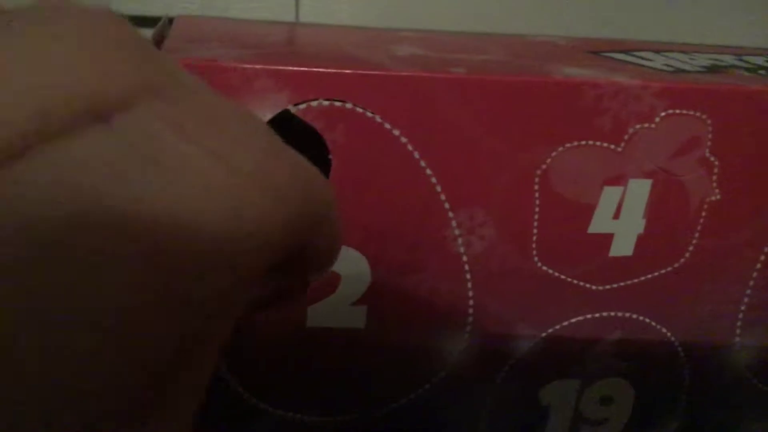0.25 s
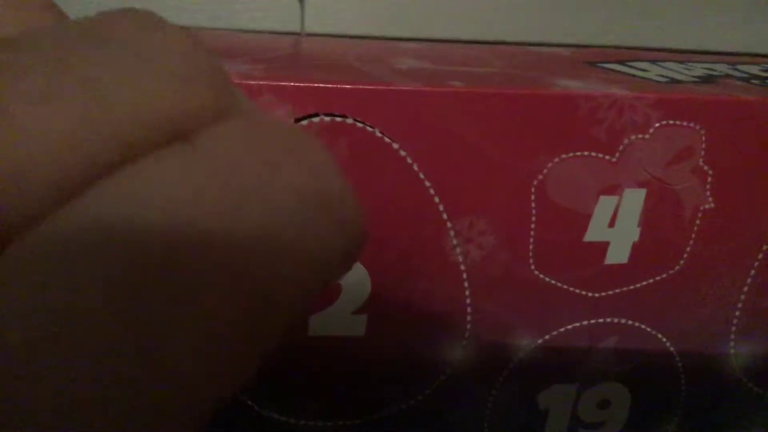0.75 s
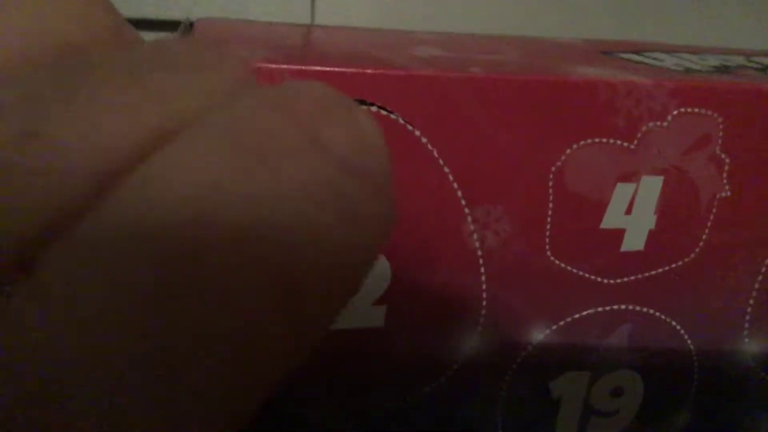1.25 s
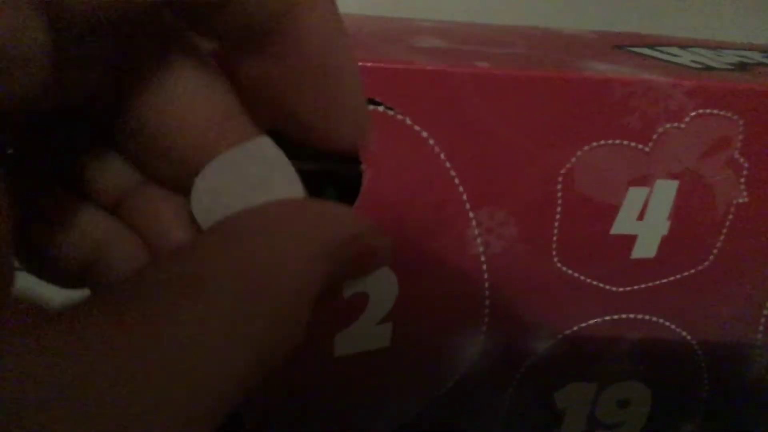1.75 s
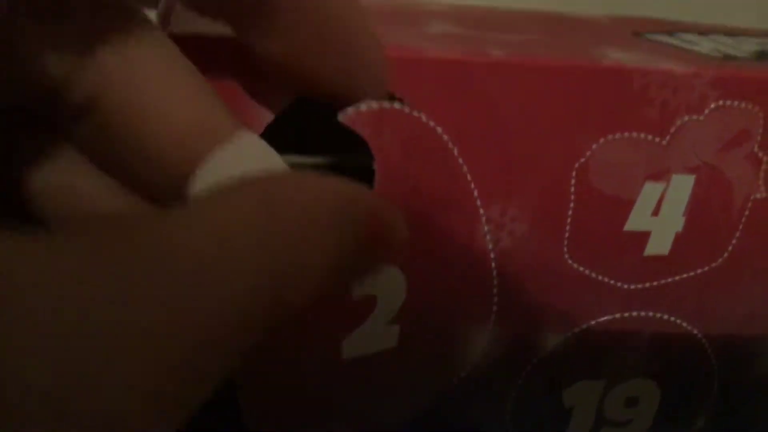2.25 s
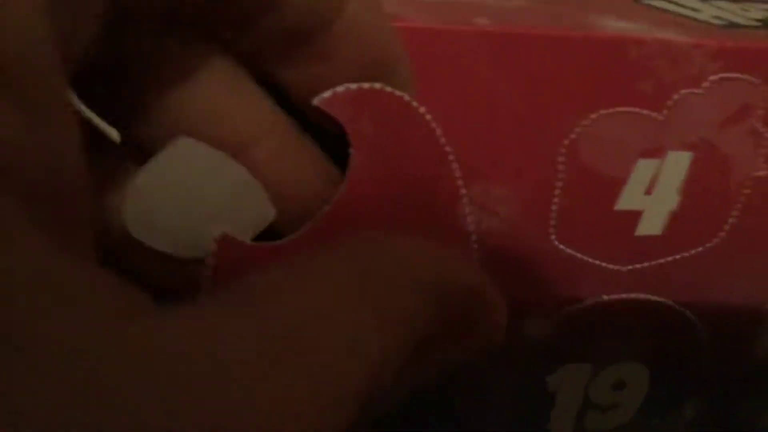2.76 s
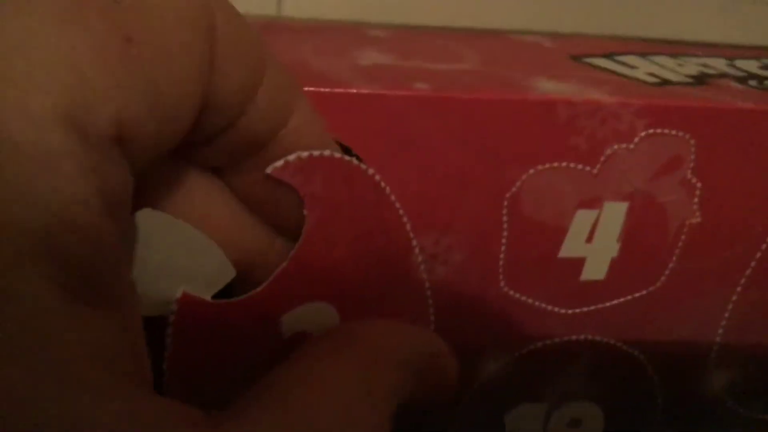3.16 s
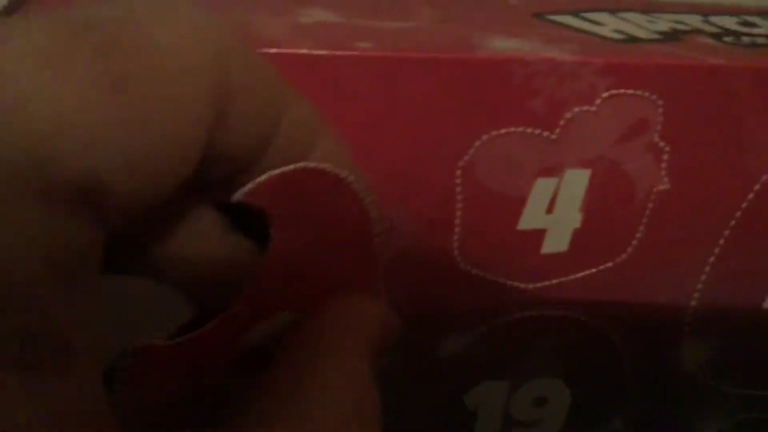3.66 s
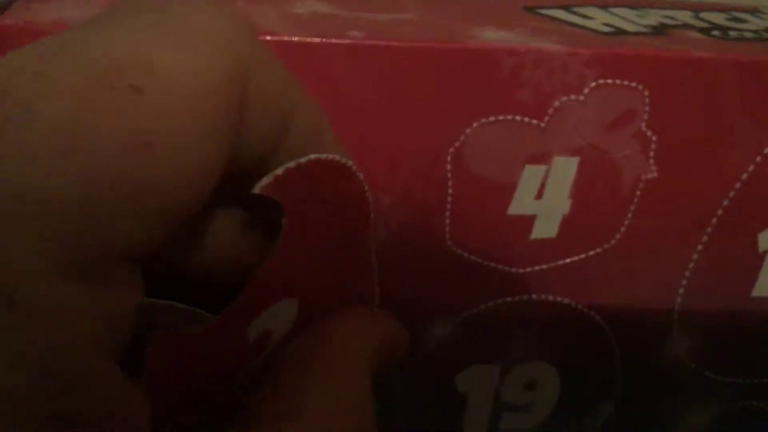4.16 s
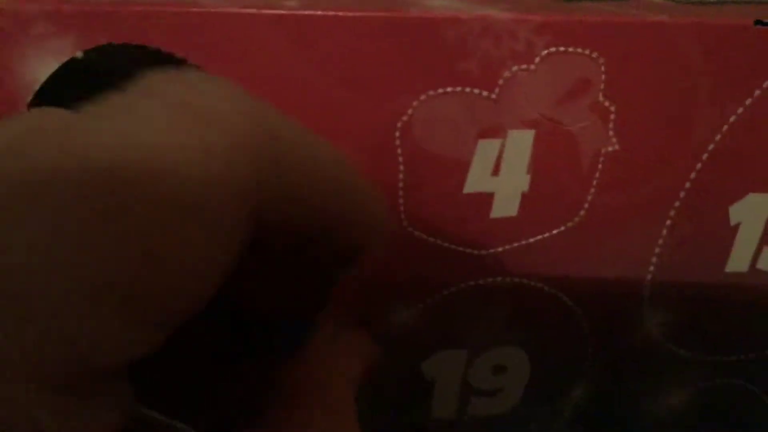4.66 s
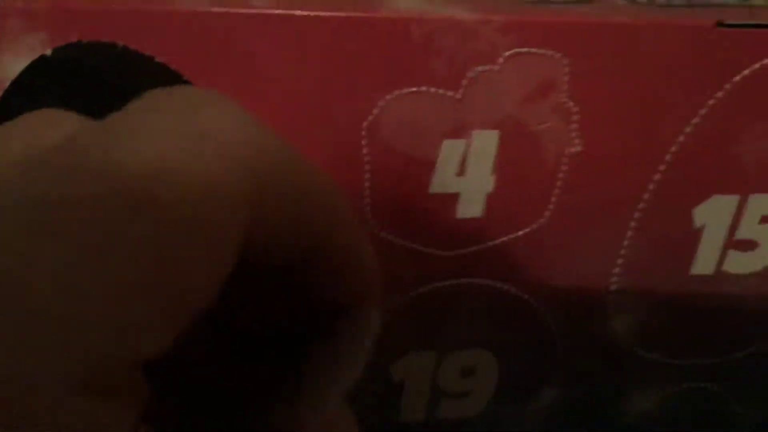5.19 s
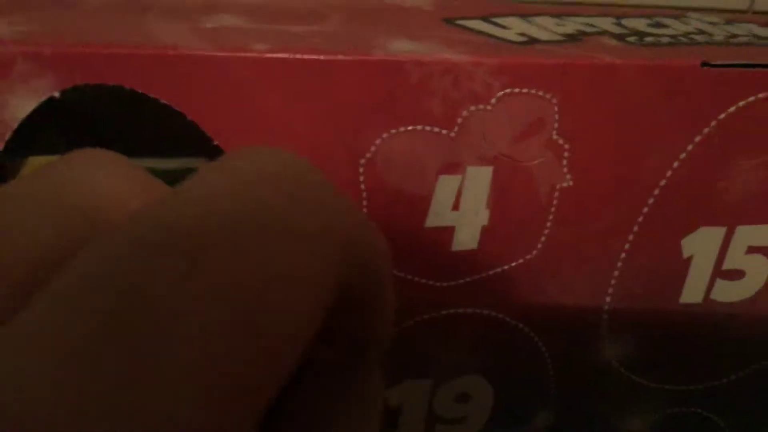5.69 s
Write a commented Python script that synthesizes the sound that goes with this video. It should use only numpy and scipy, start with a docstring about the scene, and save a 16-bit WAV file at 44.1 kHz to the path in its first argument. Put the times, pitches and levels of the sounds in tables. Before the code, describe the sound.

Very close to the microphone in a small quiet room, fingers work at a cardboard door. Dry snaps come irregularly in the first two seconds, with soft rubbing between. After a quieter stretch, two loud cracks land together, then a cluster of hollow pops, a crackly rasping peel and one last strong snap before faint ticks.

```python
"""Fingers pick at the perforated door of a cardboard box, close to the microphone in a small, quiet room.
The paper bridges of the perforation break one by one: each snap is an impulse that excites the box's modes.
In between, skin slides over the card by stick and slip, and torn edges scrape, rasp and tick.
Short room reflections follow the sounds, over a low background rumble with a faint hiss."""
import sys
import numpy as np
from scipy import signal
from scipy.fft import rfft, irfft, next_fast_len
from scipy.io import wavfile
from scipy.ndimage import uniform_filter1d

SR = 44100
rng = np.random.default_rng(int(sys.argv[2]) if len(sys.argv) > 2 else 0)


def bounce(signal):
    """Save signal as a 16-bit WAV file at the path given by the first command-line argument."""
    frames = np.transpose(np.atleast_2d(signal))
    limited = np.clip(frames, -1, 1)
    pcm = np.round(limited * 32767).astype(np.int16)
    wavfile.write(sys.argv[1], SR, pcm)


N = 261500
SIZE = 4096  # samples in a blow or a filter

# strokes of a finger over the card, levels before mixing: (start [s], length [s], pressure [dB],
#  swell from start to end [dB], panel drumming against skin [dB], fibres scraping against skin [dB])
STROKES = [(0.005, 0.038, -64, 5, -1.5, -9.5), (0.211, 0.072, -81, -7, 8, 6.5),
           (0.283, 0.11, -75, 15.5, 6.5, -5), (0.99, 0.1, -60.5, -2, 1.5, -8.5),
           (1.102, 0.15, -77, -5, 9, -12.5), (1.324, 0.14, -67.5, 9, -3, -12),
           (1.474, 0.087, -69, 5, -6, -12.5), (1.539, 0.1, -65.5, -2, -0.5, -9),
           (1.669, 0.21, -79, 3, 7.5, -4.5), (1.883, 0.02, -61, 13.5, -8, -11),
           (2.211, 0.019, -76.5, 4, 9, -7), (2.35, 0.053, -70.5, -2, 4.5, -13),
           (2.445, 0.08, -72.5, -13, -9, -11), (2.521, 0.23, -73, 2, 0.5, -13),
           (2.778, 0.27, -72, -16.5, 1.5, -14.5), (3.012, 0.109, -69.5, 6, 3, -14.5),
           (3.237, 0.1, -76.5, -14, 9.5, -14), (3.381, 0.2, -67.5, 16, -3.5, -6),
           (3.691, 0.15, -82.5, 21, 7, -5.5), (3.798, 0.064, -79.5, -5, 3, 3.5),
           (3.834, 0.114, -76, 9, 2.5, -0.5), (3.951, 0.1, -83, 3, 11, 3), (4.194, 0.13, -74, 19, 8, -5.5),
           (4.337, 0.17, -69, 4, -5.5, 1), (4.601, 0.071, -78, -1, -5, 5), (4.777, 0.084, -73.5, 1, -4, 6),
           (4.867, 0.16, -84.5, 4, 5.5, 3.5), (5.083, 0.096, -68, 25.5, 2.5, 2.5),
           (5.203, 0.18, -81, -11, -1.5, -29), (5.408, .16, -84.5, 3.5, 7, -4),
           (5.628, 0.064, -74.5, -8, -7, 2.5)]
# how far the door has come loose: (time [s], share [0-1])
LOOSE = [(1.9, 0.07), (3.5, 0.94)]
# colour of breaking card: (frequency [Hz], level [dB])
CARD = [(85, -11), (140, 1), (300, 2.5), (1900, -3.5), (3150, -3), (3650, -7.5), (4300, -3.5), (6300, -7.5),
        (7600, -14), (8400, -4.5), (10000, -4), (16000, -14)]
# colour of scraping fibres: (frequency [Hz], level per Hz [dB])
FIBRE = [(1500, -35), (4000, -5.5), (6200, -5.5), (7700, -10), (8600, 0.5), (10000, -3.5), (11800, 0.5),
         (14000, -5.5), (16000, -9.5)]


def amp(db):
    """Amplitude gain from a level in decibels."""
    return 10 ** (np.asarray(db) / 20)


def unit(x):
    """Normalises the mean power, so that the rms is 1."""
    return x / np.sqrt(np.mean(x ** 2) + 1e-20)


def read(points, hz):
    """Interpolates a table linearly on a logarithmic frequency axis."""
    f, value = np.transpose(points)
    return np.interp(np.log(hz + 1), np.log(f + 1), value)


def add(mix, s, sound):
    """Superposition: adds a sound to the mix, in place, from time s [s]."""
    part = mix[round(s * SR):][:len(sound)]
    part += sound[:len(part)]


def colour(x, points):
    """Minimum-phase filter with the given spectrum: causal, so nothing sounds ahead of a click."""
    log_gain = np.log(amp(read(points, abs(np.fft.fftfreq(SIZE, 1 / SR)))))
    taps = np.fft.ifft(np.exp(np.conj(signal.hilbert(log_gain)))).real
    return signal.fftconvolve(x, taps)[:len(x)]


def dying(t60, size):
    """Diffuse decay: noise of energy 1 in which each frequency has its own reverberation time."""
    hz, t, z = signal.stft(rng.standard_normal(size), SR, nperseg=128)
    decay = read(t60, hz)[:, None]
    z = z * amp(-60 * t / decay) / np.sqrt(decay)
    tail = signal.istft(z, SR, nperseg=128)[1][:size]
    return tail / np.linalg.norm(tail)


def wander(hz):
    """Slow random modulation: Gaussian noise limited to below hz, of rms 1."""
    size = next_fast_len(N)
    spectrum = rfft(rng.standard_normal(size))
    slow = np.fft.rfftfreq(size, 1 / SR) < hz
    return unit(irfft(spectrum * slow, size)[:N])


def resonate(x, hz, width_hz):
    """Single resonance of peak gain 1: a low-pass in a frame turning at the pitch, which may move."""
    turn = np.exp(2j * np.pi * np.cumsum(hz * np.ones(len(x))) / SR)
    r = np.exp(-np.pi * width_hz / SR)
    return 2 * (turn * signal.lfilter([1 - r], [1, -r], x / turn + 1e-18)).real


def background(waver_db=2.06):
    """Stationary noise: a low room rumble under a faint hiss, its low part wavering in level."""
    # spectrum of the background: (frequency [Hz], level per Hz [dB])
    floor = [(20, -34), (40, -9), (60, -3), (95, 1.5), (150, -0.5), (200, -1), (320, -2), (430, -13),
             (650, -16.5), (1100, -25), (2800, -27), (9000, -35.5), (15500, -40.5)]
    noise = unit(colour(rng.standard_normal(N + SIZE), floor)[SIZE:])
    low = signal.sosfilt(signal.butter(1, 500, fs=SR, output="sos"), noise)
    wavering = noise + low * (amp(waver_db * wander(8.7)) - 1)
    return amp(-67) * wavering


def room(x, build_s=0.0025):
    """Reverberation: reflections from the table and near walls build up quickly and die soon."""
    # reverberation time: (frequency [Hz], t60 [s])
    room_t60 = [(110, 0.27), (230, 0.08), (2500, 0.22), (8000, 0.26), (15000, 0.1)]
    # colour of the reflections: (frequency [Hz], level [dB])
    room_colour = [(120, -10), (240, -5), (420, -7), (680, -6.5), (1100, -17), (3000, -15), (9000, -19),
                   (14000, -15.5)]
    size = 3 * SIZE
    t = np.arange(size) / SR
    tail = dying(room_t60, size) * (1 - np.exp(-(t / build_s) ** 2))
    return signal.fftconvolve(x, colour(tail / np.linalg.norm(tail), room_colour))[:N]


def box(s, ring_db, scatter_db):
    """Modal impulse response: a direct pulse, and modes whose strength and pitch depend on the spot."""
    # resonances of box and door: (frequency [Hz], level, door shut [dB], level, door loose [dB], t60 [s])
    modes = [(128, -12.5, -21.5, 0.26), (199, -15.5, -7.5, 0.13), (320, -8.5, -9, 0.012),
             (370, -1, 3, 0.03), (510, -9.5, -7.5, 0.025), (749, -4, 2.5, 0.045), (1005, 0, -17.5, 0.021),
             (1203, -5, 3, 0.023), (1540, -0.5, -8, 0.022), (1880, -1, -0.5, 0.02),
             (2888, -0.5, -3.5, 0.018), (3300, -6.5, -5, 0.015), (4040, -4.5, 2, 0.0042),
             (9700, -10, -2.5, 0.013)]
    hz, shut_db, loose_db, t60 = np.transpose(modes)[:, :, None]
    loose = np.interp(s, *np.transpose(LOOSE))
    t = np.arange(SIZE) / SR
    mode_db = shut_db + loose * (loose_db - shut_db) + scatter_db * rng.standard_normal(hz.shape)
    hz = hz * (1 + 0.015 * rng.standard_normal(hz.shape))
    ring = (amp(mode_db - 60 * t / t60) * np.cos(2 * np.pi * hz * t)).sum(0)
    return (t == 0) + amp(ring_db) * ring / np.linalg.norm(ring)


def hollow(x, ring_db, width_hz):
    """Cavity resonance: the gap between hand and card rings, its pitch and strength shifting with the fingers."""
    # resonance of the gap: (time [s], mean pitch [Hz], strength relative to ring_db [dB])
    gap = [(1.0, 2400, -8.5), (1.43, 2810, 0), (1.55, 2500, -17), (2.38, 2370, 6), (2.75, 2490, 11),
           (3.0, 2490, -5), (3.55, 2605, 4), (4.9, 2541, 3.5), (5.3, 2540, -9.5)]
    times, pitches, strengths = np.transpose(gap)
    t = np.arange(N) / SR
    hz = np.interp(t, times, pitches)
    cupped_db = np.interp(t, times, strengths)
    wavering_hz = hz * (1 + 0.012 * wander(15))
    return x + amp(ring_db + cupped_db) * resonate(x, wavering_hz, width_hz)


def peeling():
    """Smoothed gate: 1 while the loose flap is being peeled back, else 0."""
    # span of the peeling: (from [s], to [s])
    peel_s = (4.7, 5.25)
    t = np.arange(N) / SR
    inside = (t > peel_s[0]) & (t < peel_s[1])
    return uniform_filter1d(1. * inside, size=1024)


def flap(x):
    """Plate resonances: held out from the box, the flap rings with every catch."""
    # resonances of the flap: (frequency [Hz], level [dB])
    flap_modes = [(760, -7), (1220, -20), (2600, -2.5), (4150, 0), (4900, 4), (10200, -2.5)]
    held = x * peeling()
    return x + sum(amp(db) * resonate(held, hz, width_hz=190) for hz, db in flap_modes)


def pressure(offsets_db, resting_db):
    """Contact envelope by summed power: each stroke takes hold, swells or eases, and lets go."""
    attack_s, release_s = 0.018, 0.0077
    power = np.full(N, amp(resting_db) ** 2)
    t = np.arange(SR // 2) / SR
    for (start, length, level_db, swell_db, *_), offset_db in zip(STROKES, offsets_db):
        shape = np.minimum(t / attack_s, 1) * np.exp(-np.maximum(t - length, 0) / release_s)
        stroke_db = level_db + offset_db + swell_db * (np.minimum(t / length, 1) - .5)
        add(power, start, (shape * amp(stroke_db)) ** 2)
    return np.sqrt(power)


def slide(contact, spectrum, slips_per_s, spread_db, hiss_db, ring_db, flutter_db):
    """Stick and slip: a hail of tiny slips of uneven size over a fine hiss, heard through the box."""
    sizes = amp(spread_db * np.minimum(rng.exponential(1, N), 4.5)) * rng.choice([-1, 1], N)
    slips = unit(sizes * (rng.random(N) < slips_per_s / SR))
    friction = slips + amp(hiss_db) * rng.standard_normal(N)
    # the box keeps its final, loose state throughout
    body = box(N / SR, ring_db, scatter_db=4.5)
    sound = colour(signal.fftconvolve(friction, body)[:N], spectrum)
    return unit(sound) * contact * amp(flutter_db * wander(30))


def rip(contact, per_s, jitter, spread_db, body_db, count=1500):
    """Near-periodic pulse train: fibres along the tear give way one after another, a rasp."""
    gaps, sizes = rng.standard_normal((count, 2)).T
    times = np.cumsum(np.exp(jitter * gaps)) / per_s
    gains = amp(spread_db * np.clip(sizes, -2, 2))
    n = np.arange(SIZE // 32)
    pulses = np.zeros(N)
    for s, gain in zip(times, gains):
        add(pulses, s, gain * rng.standard_normal(len(n)) * np.exp(-n / 30))
    return contact * unit(colour(pulses, FIBRE) + amp(body_db) * colour(pulses, CARD))


def rubbing():
    """Friction noise: the panel drums, skin hisses on the print, torn fibres scrape, crackle and rasp."""
    # colours of the drumming panel, sliding skin and crackling loose fibres: (frequency [Hz], level per Hz [dB])
    drum_colour = [(50, -22), (150, 7.5), (380, -3), (590, -3), (730, 2.5), (860, -2), (1150, -1.5),
                   (1700, -7), (6000, -58)]
    skin_colour = [(600, -37.5), (1800, -10.5), (2420, -1), (3050, -3), (4300, -2.5), (5300, -9.5),
                   (7500, -20), (15000, -35)]
    crackle_colour = [(150, -11.5), (700, 4), (1400, -2.5), (3000, -4.5), (6500, -16.5), (10000, -15),
                      (16000, -20.5)]
    # the hand never lies quite still, levels before mixing: (drumming [dB], skin [dB], fibres [dB])
    resting_db = (-86, -95.5, -91.5)
    *_, drum_db, fibre_db = np.transpose(STROKES)
    on_panel = pressure(drum_db, resting_db[0])
    on_print = pressure(np.zeros(len(STROKES)), resting_db[1])
    on_edge = pressure(fibre_db, resting_db[2])
    drum = slide(on_panel, drum_colour, slips_per_s=180, spread_db=3.5, hiss_db=0,
                 ring_db=-14.0, flutter_db=2.0)
    skin = slide(on_print, skin_colour, slips_per_s=600, spread_db=2.2, hiss_db=-4,
                 ring_db=-16, flutter_db=1.8)
    # the scraping is softer while the rasp is heard
    fibre = slide(on_edge * amp(-6 * peeling()), FIBRE, slips_per_s=1200, spread_db=2.5, hiss_db=-1,
                  ring_db=-7.0, flutter_db=2.0)
    crackle = slide(np.sqrt(on_panel * on_edge), crackle_colour, slips_per_s=140, spread_db=3.0, hiss_db=-25,
                    ring_db=1.5, flutter_db=1.5)
    rasp = rip(on_edge * peeling(), per_s=210, jitter=0.15, spread_db=2.0, body_db=4.5)
    smooth = amp(-1.35) * drum + amp(-4.0) * skin
    rough = amp(3.2) * fibre + amp(-2.5) * crackle + amp(0.5) * rasp
    return smooth + rough


def fracture(body, length, fibres_db, flex_db, count=14):
    """Impulsive excitation: a main break and a few later fibres ring the body; the panel flexes densely."""
    # dense flexing of the panel after a blow: (frequency [Hz], t60 [s])
    flexing = [(150, 0.069), (600, 0.11), (2500, 0.025), (6000, 0.026), (14000, 0.021)]
    pulses = np.zeros(SIZE)
    delay = np.minimum(rng.exponential(1, count), 3)  # in units of the fracture's length
    places = (delay * length * SR).astype(int) + 2
    pulses[places] = amp(fibres_db) * rng.standard_normal(count) * np.exp(-delay / 2)
    pulses[0] = 1
    ringing = signal.fftconvolve(pulses / np.linalg.norm(pulses), body)[:SIZE]
    return ringing + amp(flex_db) * dying(flexing, SIZE)


def weighted(hit, edges, levels_db):
    """Band energy: filters a blow towards the given level in each register, in two passes."""
    level_span_s = 0.025  # levels count the blow's energy as mean power over this time
    hz, edges = np.fft.rfftfreq(SIZE, 1 / SR), np.array(edges)
    centres = np.sqrt(edges[1:] * edges[:-1])
    for _ in range(2):
        power = abs(rfft(hit)) ** 2 * 2 / (SIZE * level_span_s * SR)
        bands = [power[(hz >= lo) & (hz < hi)].sum() for lo, hi in zip(edges, edges[1:])]
        hit = colour(hit, np.c_[centres, levels_db - 10 * np.log10(bands)])
    return hit


def ticks():
    """Light impulses: tiny catches of nail and torn edge."""
    # catches, levels before mixing: (time [s], strength [dB], treble against body [dB])
    catches = [(0.203, -67, -10), (0.3586, -62.5, -1.5), (0.4753, -71.5, 0.5), (1.5551, -60.5, 1),
               (1.758, -65.5, 4.5), (2.342, -72.5, -0.5), (2.607, -70, -18), (2.767, -67.5, -7.5),
               (3.981, -67, -4), (4.0191, -64.5, -24), (4.0908, -68, -21.5), (4.1046, -77.5, 10),
               (4.664, -70.5, 9), (4.7937, -75.5, 9.5), (4.821, -59.5, 3), (4.8466, -61, 4.5),
               (4.894, -75, 8.5), (4.9219, -69, -3.5), (4.97, -75, 1), (4.985, -70, 4.5),
               (4.9951, -66, 4.5), (5.017, -70, 7), (5.115, -75, 12), (5.129, -68, 10), (5.144, -57, 0),
               (5.4696, -71, -14), (5.49, -70, -22), (5.517, -66, -21), (5.5333, -66, -11),
               (5.546, -73, -16), (5.5601, -65, -10.5), (5.9205, -70, -5.5)]
    # edges of the body and treble registers: [Hz]
    tick_bands = [600, 4500, 16000]
    out = np.zeros(N)
    for s, strength_db, treble_db in catches:
        body = box(s, ring_db=2.5, scatter_db=2.5)
        hit = fracture(body, 0.0018, fibres_db=1.0, flex_db=5.5)
        hit = colour(colour(hit, CARD), [(150, -7.0), (900, -5)])
        levels_db = np.array([strength_db, strength_db + treble_db])
        add(out, s, weighted(hit, tick_bands, levels_db))
    return amp(-3.5) * out


def disperse(x, taut):
    """Dispersion of bending waves: card carries the treble first and the bass a little later."""
    for corner_hz in (300, 900, 2000, 5000):  # all-pass stages
        pole = np.exp(-2 * np.pi * corner_hz / SR)
        x = signal.lfilter([-pole, 1], [1, -pole], x)
    # a door held taut delays the bass further, below bloom_hz and by up to bloom_s
    bloom_s, bloom_hz = 0.00912, 217
    hz = np.fft.rfftfreq(2 * SIZE, 1 / SR)
    lag = np.exp(-2j * np.pi * taut * bloom_s * bloom_hz * np.arctan(hz / bloom_hz))
    return irfft(rfft(x, 2 * SIZE) * lag)[:SIZE]


def snaps():
    """Impulse and modal response: a break kicks the box, the struck spot rings, the room gets the broad thud."""
    # bridges breaking and the card buckling, levels before mixing: (time [s], length of the fracture [s],
    #  strength [dB], extra weight of the box's thump [dB], extra brightness [dB],
    #  ring of the struck spot [dB], room echo [dB], lower pitch of the spot [Hz], upper pitch [Hz])
    breaks = [(0.5351, 0.00045, -40.5, 0, 10, 8, -1, 160, 738),
              (0.7911, 0.0012, -53.5, -1.5, 1, 7, 0.5, 210, 1660),
              (0.9332, 0.00045, -49, 2.5, -1, 6, 3.5, 366, 1220),
              (0.9436, 0.00085, -60, 7.5, 11, 3, -3, 376, 1650),
              (0.9802, 0.00065, -41.5, 6.5, -15, 21.3, 0, 130, 410),
              (1.1107, 0.0013, -55.5, -7.5, 6, 21, -1, 407, 1224),
              (1.4422, 0.00033, -39, -8, -2, 20, 0.5, 308, 1270),
              (1.636, 0.00092, -40, 6.5, -7.5, 17.6, 0, 130, 385),
              (1.7954, 0.00064, -40, -5.5, -5, 22.5, -3, 292, 1005),
              (3.2341, 0.004, -72, 17.5, -7, 5.7, 7.5, 166, 370),
              (3.5342, 0.00029, -27.5, -10.5, -0.5, 5, -2, 790, 1880),
              (3.5888, 0.00053, -30.5, -4, 5.5, 2.7, -4, 770, 1313),
              (4.2979, 0.00091, -36, 2.5, 6.5, 27, -1, 180, 380),
              (4.3684, 0.000692, -32.5, -0.5, 0, 5, -3.5, 370, 775),
              (4.4415, 0.0012, -44.5, 3, 5.5, 8.2, -0.5, 255, 590),
              (5.1769, 0.0016, -31, 1, -2, 6, -2.5, 255, 720)]
    # edges of the registers: [Hz]
    snap_bands = [90, 250, 600, 1600, 4500, 8000, 16000]
    # an ordinary snap, a row a register: (level [dB], share of extra weight [1], share of extra brightness [1])
    snap_tone = [(-7, 1.28, 0.17), (-3.5, 0.84, 0), (-.5, 0.39, 0), (-1, 0.054, 0.12), (-8.5, 0, .9),
                 (-7, 0.41, 1.07)]
    tone_db, bass, treble = np.transpose(snap_tone)
    spot_width_hz, spot_damping = 22, 0.13  # a loose door widens the ring by this share of its pitch
    near, far = np.zeros(N), np.zeros(N)
    push = signal.unit_impulse(SIZE)
    for s, length, strength_db, weight_db, bright_db, spot_db, echo_db, *spot_hz in breaks:
        levels_db = strength_db + tone_db + bass * weight_db + treble * bright_db
        taut = 1 - np.interp(s, *np.transpose(LOOSE))
        spot = sum(resonate(push, hz, spot_width_hz + spot_damping * hz * (1 - taut)) for hz in spot_hz)
        body = box(s, ring_db=-7, scatter_db=0.5) + amp(spot_db) * spot
        hit = colour(fracture(body, length, fibres_db=-4.5, flex_db=2), CARD)
        hit = disperse(hit, taut)
        thud = colour(box(s, ring_db=-12.5, scatter_db=5.5), CARD)
        add(near, s, weighted(hit, snap_bands, levels_db))
        add(far, s, amp(echo_db) * room(weighted(thud, snap_bands, levels_db)))
    return amp(-0.49) * near + amp(0.5) * far


def scene():
    """Superposition of the background, the handling with its reverberation, and the snaps."""
    handling = flap(hollow(ticks() + rubbing(), ring_db=1, width_hz=260))
    breaking = hollow(snaps(), ring_db=3.0, width_hz=230)
    return (background() + handling + room(handling) + breaking)[None]


def record(dry):
    """Band limiting: the microphone's low cut at 42 Hz and the recorder's upper limit at 16 kHz."""
    low_cut = signal.butter(3, 42, "highpass", fs=SR, output="sos")
    thin = signal.sosfilt(low_cut, dry)
    band_limit = signal.firwin(255, 16000, window=("kaiser", 9), fs=SR)
    return signal.oaconvolve(thin, band_limit[None], "same")


dry = scene()
out = record(dry)
bounce(out)
```